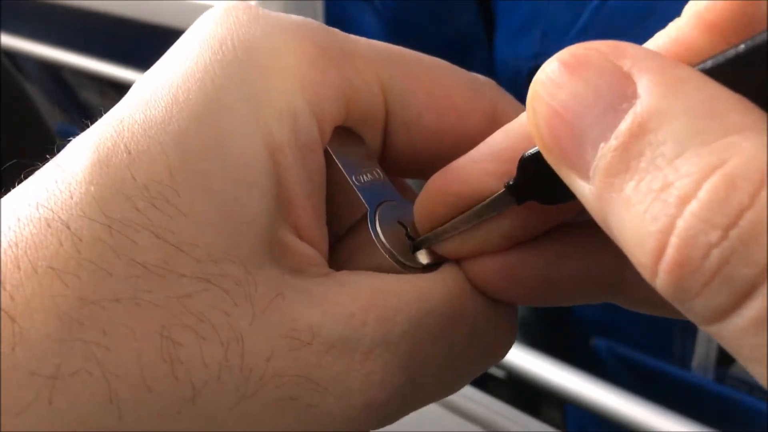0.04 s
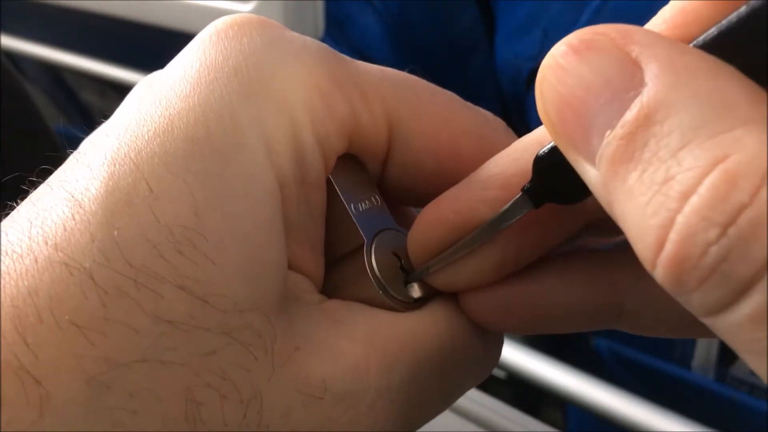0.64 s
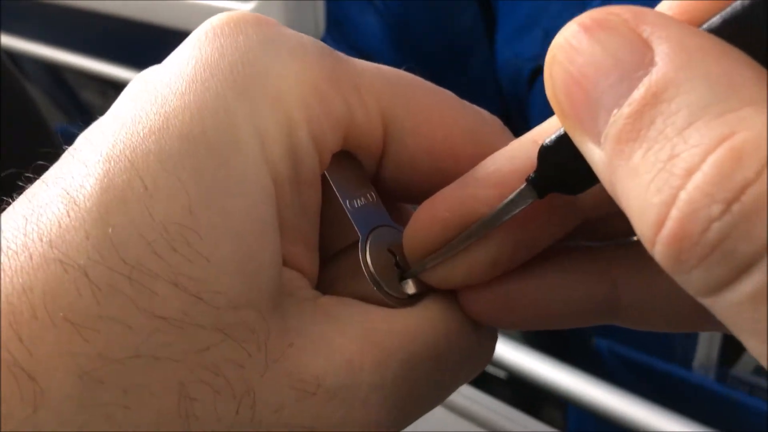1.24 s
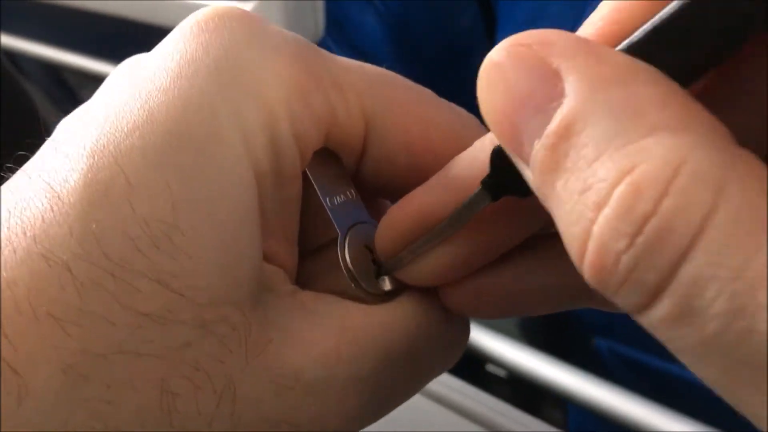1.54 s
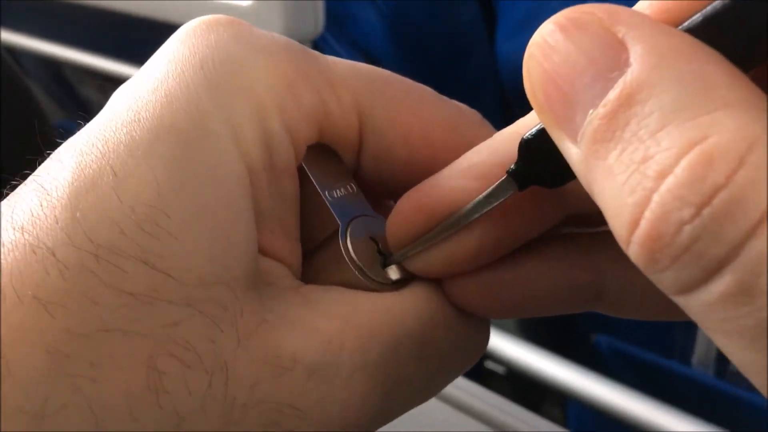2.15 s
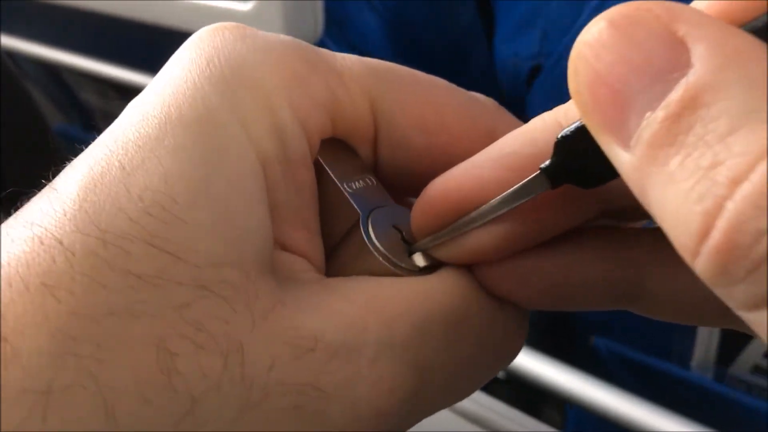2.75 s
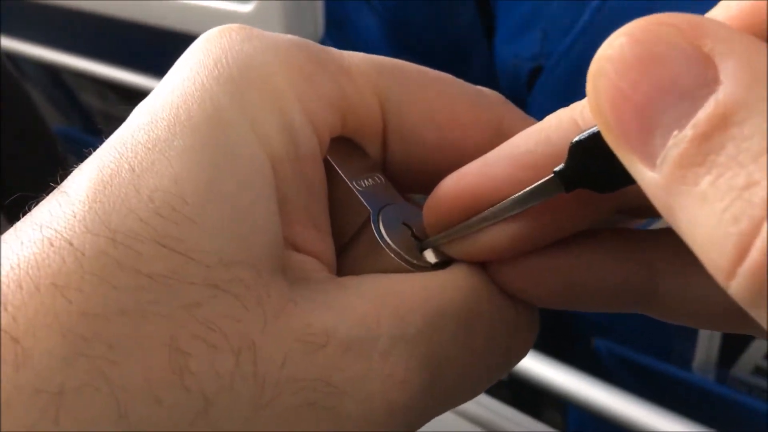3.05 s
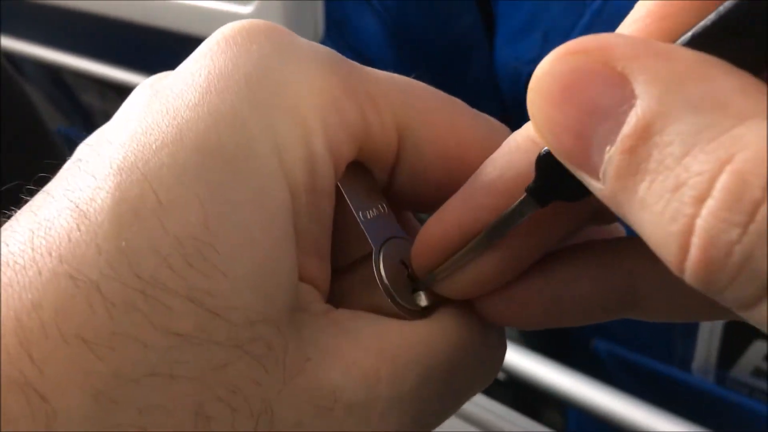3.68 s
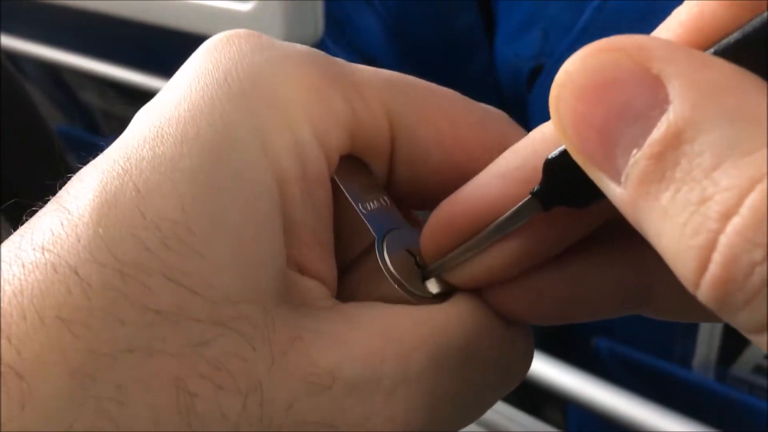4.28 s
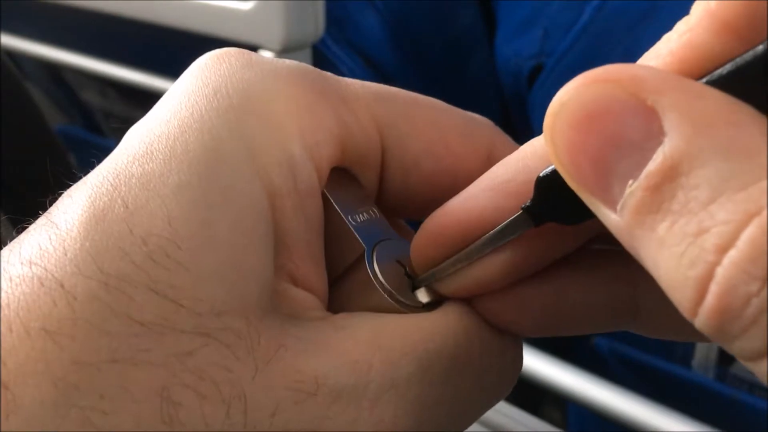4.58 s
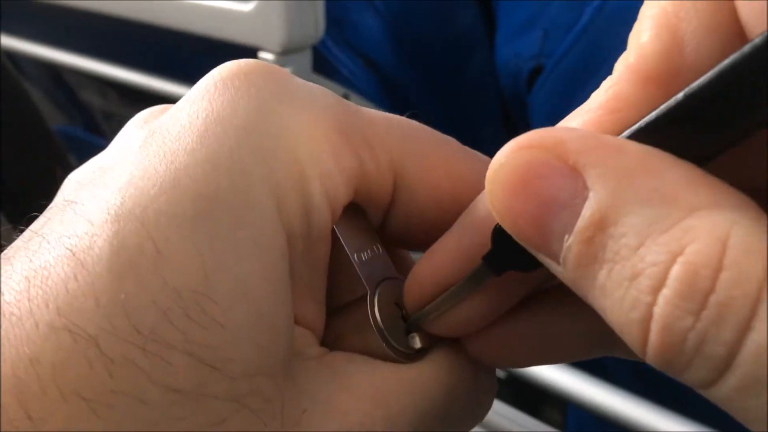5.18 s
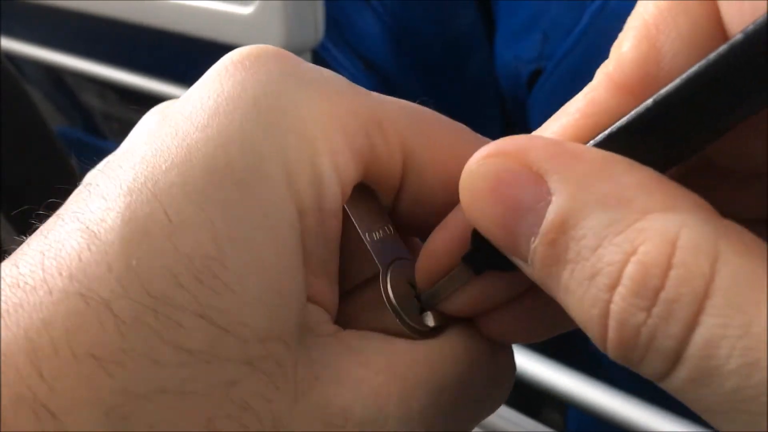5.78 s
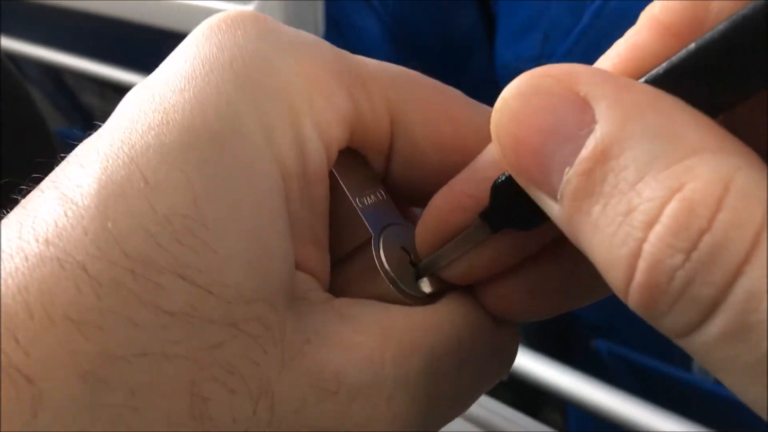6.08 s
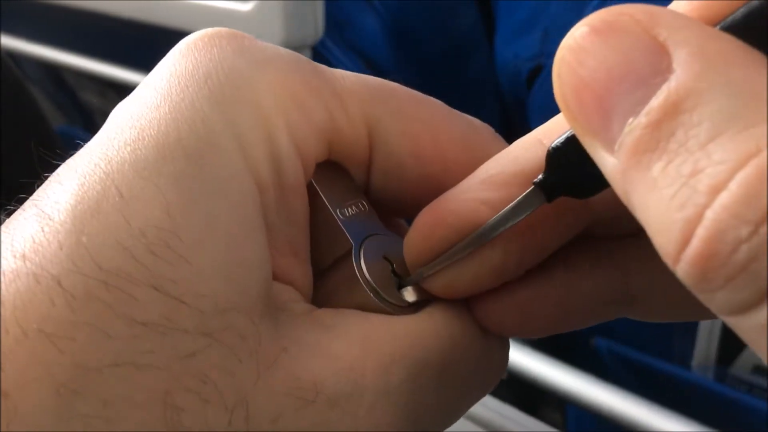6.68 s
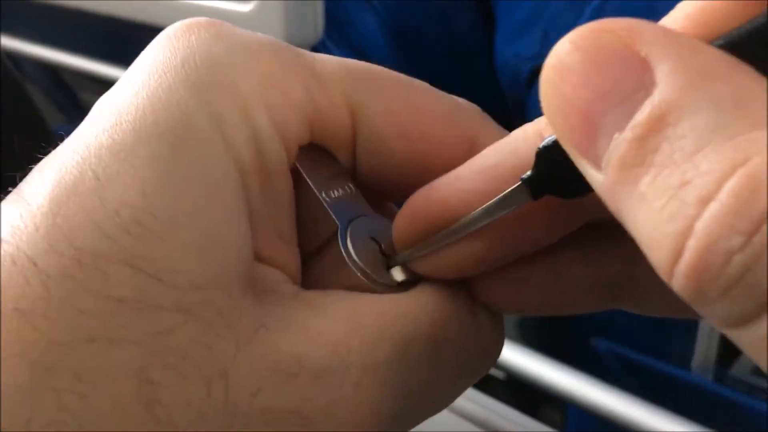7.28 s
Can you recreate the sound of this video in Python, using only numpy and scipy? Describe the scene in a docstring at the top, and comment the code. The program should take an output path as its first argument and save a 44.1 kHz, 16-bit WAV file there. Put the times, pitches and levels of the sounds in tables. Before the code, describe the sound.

A steady, low propeller drone fills an airliner cabin in flight, with faint, dry ticks of a pick working a small lock.

```python
"""Inside a propeller airliner in cruise. The periodic loading of the blades radiates a harmonic hum,
which stands over the rumble and hiss of turbulent air on the fuselage, a few thin machine whines
and a narrow cabin resonance. Now and then the airflow swells or the hiss dips for an instant.
Close by, a pick works the pins of a small lock: each impact excites damped modes, a faint, dry tick."""
import sys
import numpy as np
from scipy import signal
from scipy.fft import rfft, irfft
from scipy.io import wavfile
from scipy.ndimage import uniform_filter1d

SR = 44100
rng = np.random.default_rng(int(sys.argv[2]) if len(sys.argv) > 2 else 0)


def materialize(psi):
    """Save the field psi as 16-bit PCM at rate SR to the path in sys.argv[1].

    A 1-D psi becomes a single channel; in a 2-D psi each row is a channel.
    """
    bounded = np.clip(np.atleast_2d(psi).T, -1, 1)
    quanta = np.round(bounded * 32767).astype(np.int16)
    wavfile.write(sys.argv[1], SR, quanta)


N = 323253
TIME = np.arange(N) / SR


def propellers(blade_hz=98.4, wander_hz=0.12, blade_db=-29.5, third_db=-69, sway_db=0.3):
    """Periodic loading: harmonics of a governed blade rate, their levels swayed a little by turbulence."""
    # the second harmonic fades and returns: time_s, level_db
    octave = [(0, -43.5), (1.1, -42.5), (1.9, -46), (2.9, -43), (3.5, -51), (4.5, -46.5), (5.3, -50.5),
              (6.3, -46), (6.8, -41.5), (7.3, -48.5)]
    cycles = np.cumsum(blade_hz + wander_hz * drift(1.27)) / SR
    hum = np.zeros(N)
    for order, db in enumerate([blade_db, curve(octave), third_db], 1):
        hum += amp(db + sway_db * drift(3.5)) * np.sin(2 * np.pi * (order * cycles + rng.random()))
    return np.sqrt(2) * hum


def rumble(level_db=-32.5, top_hz=1000, boom_hz=181.4, boom_width_hz=40):
    """Boundary-layer excitation: turbulence shakes the fuselage panels, which transmit mostly bass."""
    # spectrum of air on the fuselage: frequency_hz, relative_db
    spectrum = [(20, -36), (33, -26), (52, -8.5), (62, -2), (78, -3), (89, -9.5), (106, -3.5), (117, -0.5),
                (160, -0.5), (185, 0.5), (205, -4), (225, -3.5), (255, -6.5), (310, -16.5), (365, -14),
                (440, -18.5), (510, -24), (900, -36)]
    # slow swell of the band around boom_hz: time_s, gain_db
    boom_swell = [(0, 1), (.45, -2.5), (1.15, 1.5), (1.5, 0), (2.65, -1.5), (2.87, 1), (3.25, 1.5),
                  (3.68, -1.5), (3.83, 1), (4.5, 1), (4.75, -2), (5.2, -1.5), (5.8, -1.5), (6.04, 3),
                  (6.3, -1), (6.8, 2), (7.33, -1.5)]
    air = noise(lambda hz: amp(read(spectrum, hz)) / (1 + (hz / top_hz) ** 8))
    band = np.exp(-((np.fft.rfftfreq(N, 1 / SR) - boom_hz) / boom_width_hz) ** 4)
    boom = irfft(rfft(air) * band, N)
    envelope = np.sqrt(uniform_filter1d(boom ** 2, size=SR // 2))
    steady_boom = boom / unit_rms(envelope)
    return amp(level_db) * (air - boom + steady_boom * amp(curve(boom_swell)))


def hiss(level_db=-54, sway_db=0.25, ripple_db=0.6, low_cut_hz=200, dip_from_hz=2300):
    """Turbulent flow: broadband noise, coloured by resonances; its treble dips briefly now and then."""
    # spectrum of air rushing through the cabin: frequency_hz, relative_db
    spectrum = [(300, 1), (700, -2.5), (1000, 0.5), (1400, -4.5), (2000, -6.5), (2550, -8.5), (3600, -13.5),
                (4500, -12), (4900, -19.5), (5600, -13.5), (7600, -16), (9800, -13), (10450, -17),
                (11000, -15.5), (15600, -21.5), (16000, -28)]
    # resonances and hollows: centre_hz, width_hz, lift_db
    resonances = [(2960, 340, 4.2), (2975, 42, 1.5), (3840, 160, -3), (4020, 93, 3.5), (6800, 440, 2.5),
                  (8840, 1200, 3), (8900, 140, 1.5), (10450, 150, -5)]
    # dips of the treble: time_s, length_s, gain_db
    dips = [(0.111, 0.015, -5), (0.238, 0.015, -9), (1.524, 0.009, -4), (1.839, 0.014, -10),
            (3.226, 0.011, -7), (3.442, 0.0084, -5), (3.823, 0.0081, -8), (5.446, .009, -4),
            (6.47, 0.013, -8), (6.577, 0.014, -9), (6.768, 0.01, -15), (6.896, 0.013, -7),
            (7.077, 0.024, -4)]

    def colour(hz):
        db = read(spectrum, hz) + bells(resonances, hz) + ripple_db * standing_waves(hz)
        return amp(db) * hz ** 2 / (hz ** 2 + low_cut_hz ** 2)

    air = amp(level_db + sway_db * drift(2.6)) * noise(colour)
    low = signal.sosfiltfilt(signal.butter(3, dip_from_hz, fs=SR, output="sos"), air)
    return low + (air - low) * amp(bells(dips, TIME))


def standing_waves(hz, spacing_hz=45):
    """Interference: cabin reflections leave a fine, stationary ripple of rms 1 across the spectrum."""
    knots = np.arange(1200) * spacing_hz
    return unit_rms(np.interp(hz, knots, rng.standard_normal(len(knots))))


def pick(gain_db=14, slip_db=-6, tail_db=-39, tail_t60_s=0.1):
    """Impact and friction: a snap and micro-slips ring pick and lock; the seats scatter a faint tail."""
    # pick meets pin: start_s, steel_relative_db, lock_relative_db, scrape_s,
    # steel_favoured_hz, lock_favoured_hz
    ticks = [(1.6765, -48, -53, .0006, 14000, 5500), (1.6821, -45, -47, .0012, 14000, 5500),
             (1.7075, -49, -58, .0015, 14000, 5500), (2.0413, -39, -50, .0008, 13500, 7000),
             (2.6285, -36.5, -41, .001, 14400, 6400), (3.49, -37, -40, 0.0016, 11400, 3400),
             (3.5245, -44, -53, .0008, 13000, 7500), (3.93, -39, -47, .0012, 13000, 7000),
             (3.936, -47, -57, .0006, 13000, 7000), (3.942, -49, -57, .0015, 13000, 7000),
             (4.4478, -23.5, -34.5, 0.0019, 15200, 5600), (4.4505, -24.5, -38, 0.0018, 11800, 4200),
             (4.8233, -24, -35, 0.0018, 15300, 4600), (4.96, -43, -58, .001, 14000, 6000),
             (5.4612, -36.5, -44, 0.00054, 12000, 5350), (5.822, -50, -46, .001, 12000, 5500),
             (5.862, -34, -43.5, .0012, 11400, 6700), (6.224, -34, -56, .0008, 14500, 4500),
             (6.2806, -22.5, -34, 0.0019, 13500, 2400), (6.3896, -38.5, -53, .0007, 13000, 5500),
             (6.4012, -24.5, -38, 0.0015, 14500, 2400), (6.918, -42, -49, .001, 13500, 7500),
             (7.1903, -43, -54, .001, 14000, 7000), (7.199, -48, -60, .0007, 14000, 7000)]
    # modes of the steel pick and pins: pitch_hz, relative_db, t60_s
    steel_modes = [(9700, -5.5, 0.004), (11200, -3.5, 0.0045), (12350, -2, 0.0047), (13150, -1.5, 0.0036),
                   (14560, 0.5, 0.0045), (15550, -1, 0.004)]
    # modes of the lock cylinder held in the fist: pitch_hz, relative_db, t60_s
    lock_modes = [(1750, -17, .0036), (2410, -5.5, 0.009), (2930, -7, 0.0078), (3450, -10, .004),
                  (4040, -7.5, 0.0043), (4830, -5, 0.0051), (5650, -2.5, 0.0052), (6650, -2.5, 0.0045),
                  (7640, -3, 0.0048), (8540, 0, 0.0051)]
    t = np.arange(2048) / SR
    out = np.zeros(N)
    for start_s, steel_db, lock_db, scrape_s, steel_hz, lock_hz in ticks:
        slips, scatter = rng.standard_normal((2, len(t)))
        force = amp(slip_db) * slips * np.exp(-t / scrape_s)
        force += scatter * amp(tail_db - 60 * t / tail_t60_s)
        force[0] += 2  # the snap
        add(out, start_s, amp(steel_db) * ring(force, steel_modes, steel_hz))
        add(out, start_s, amp(lock_db) * ring(force, lock_modes, lock_hz))
    return amp(gain_db) * out


def ring(force, modes, favoured_hz, favour_db=5.5, favour_octaves=0.2, spread=0.011):
    """Modal response of energy 1: the contact point detunes the modes and lifts those near favoured_hz."""
    t = np.arange(len(force)) / SR
    hz, db, t60_s = np.transpose(modes)[:, :, None]
    lift_db = favour_db * np.exp(-(np.log2(hz / favoured_hz) / favour_octaves) ** 2)
    detuned_hz = hz * (1 + spread * rng.standard_normal(hz.shape))
    partials = amp(db + lift_db - 60 * t / t60_s) * np.sin(2 * np.pi * detuned_hz * t)
    response = partials[::2].sum(0) - partials[1::2].sum(0)  # neighbouring modes alternate in sign
    sound = signal.fftconvolve(force, response)[:len(t)]
    return sound / np.linalg.norm(sound)


def machinery(sway_db=1.3):
    """Rotational tones: engines and fans radiate thin sinusoids that waver in pitch and level."""
    # shaft tones and whines: pitch_hz, level_db, wander_hz
    whines = [(82, -53, .3), (133, -48, .4), (707.5, -66.8, .6), (3591, -78.3, 1.5), (4003, -85.5, 4),
              (4085, -88, 4), (6639, -83.5, 3)]
    return sum(amp(db + sway_db * drift(3.8)) * tone(hz + wander_hz * drift(6.4))
               for hz, db, wander_hz in whines)


def cabin_resonance(pitch_hz=608, half_width_hz=31, wander_hz=5.49, level_db=-62, sway_db=0.7):
    """Flow-excited resonance: a narrow moan, part tone and part noise, swells as the airflow feeds it."""
    # surges of the resonance: time_s, length_s, lift_db
    surges = [(1.0, .13, 3.5), (2.14, .15, 6), (3.525, 0.18, 9), (4.1, 0.3, 5), (5.68, 0.22, 6),
              (6.092, 0.1, 10), (6.696, 0.35, 5)]
    whistle = tone(pitch_hz + wander_hz * drift(19.8))
    breath = amp(-5) * noise(lambda hz: 1 / (1 + ((hz - pitch_hz) / half_width_hz) ** 2))
    return amp(level_db + sway_db * drift(0.69) + bells(surges, TIME)) * unit_rms(whistle + breath)


def gusts(width_octaves=0.32):
    """Unsteady flow: each swell of the air is a soft band of noise that rises and sinks."""
    # swells of the airflow: peak_s, length_s, level_db, centre_hz
    swells = [(3.58, .13, -47, 306), (3.85, .13, -60, 820), (6.09, 0.073, -61, 657), (6.58, .15, -60, 716)]
    out = np.zeros(N)
    for peak_s, length_s, db, centre_hz in swells:
        band = noise(lambda hz: np.exp(-(np.log2((hz + 1) / centre_hz) / width_octaves) ** 2))
        out += amp(db) * np.exp(-((TIME - peak_s) / length_s) ** 2) * band
    return out


def amp(db):
    """Decibels to amplitude ratio."""
    return 10 ** (np.asarray(db) / 20)


def unit_rms(x):
    """Normalises to rms 1."""
    return x / np.sqrt(np.mean(x ** 2) + 1e-20)


def read(points, hz):
    """Interpolates a spectrum on a log-frequency axis."""
    knots_hz, db = np.transpose(points)
    return np.interp(np.log(hz + 1), np.log(knots_hz), db)


def curve(points):
    """Interpolates a control curve at every sample."""
    return np.interp(TIME, *np.transpose(points))


def bells(rows, axis):
    """Superposes Gaussian peaks and hollows, in decibels, along time or frequency."""
    return sum(db * np.exp(-2 * ((axis - centre) / width) ** 2) for centre, width, db in rows)


def tone(hz):
    """Sinusoid of rms 1 whose phase is the integral of its frequency."""
    return np.sqrt(2) * np.sin(2 * np.pi * np.cumsum(hz) / SR)


def noise(gain):
    """Filtered noise of rms 1 whose spectrum follows gain(hz)."""
    return unit_rms(irfft(rfft(rng.standard_normal(N)) * gain(np.fft.rfftfreq(N, 1 / SR)), N))


def drift(rate_hz):
    """Slow random fluctuation of rms 1, band-limited to about rate_hz."""
    return noise(lambda hz: (hz > 0) * np.exp(-(hz / rate_hz) ** 2))


def add(mix, start_s, sound):
    """Superposes a sound on the mix from start_s."""
    part = mix[max(round(start_s * SR), 0):][:len(sound)]
    part += sound[:len(part)]


def scene():
    """Superposition: the cabin drone and the nearby lock sum in one channel."""
    return (propellers() + machinery() + cabin_resonance() + rumble() + hiss() + pick() + gusts())[None]


def record(dry):
    """Band limiting: a linear-phase low-pass removes the highest treble."""
    edge_hz = 16050
    low_pass = signal.firwin(511, edge_hz, window=("kaiser", 9), fs=SR)
    return signal.oaconvolve(dry, low_pass[None], "same")


dry = scene()
out = record(dry)
materialize(out)
```